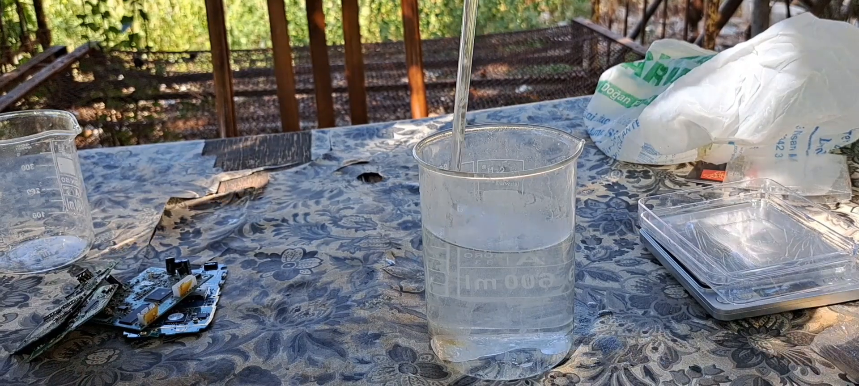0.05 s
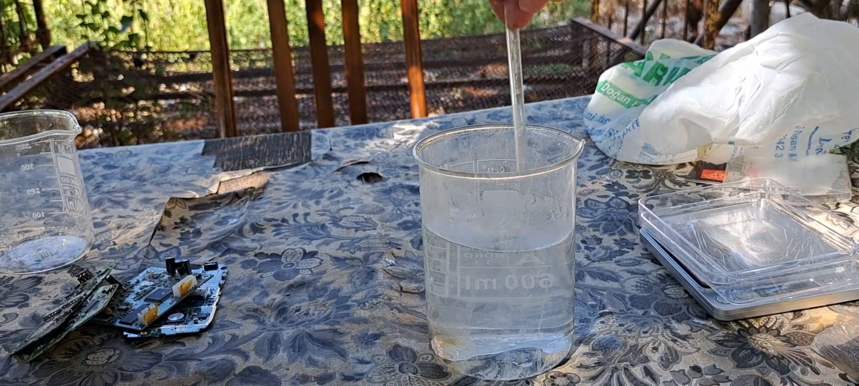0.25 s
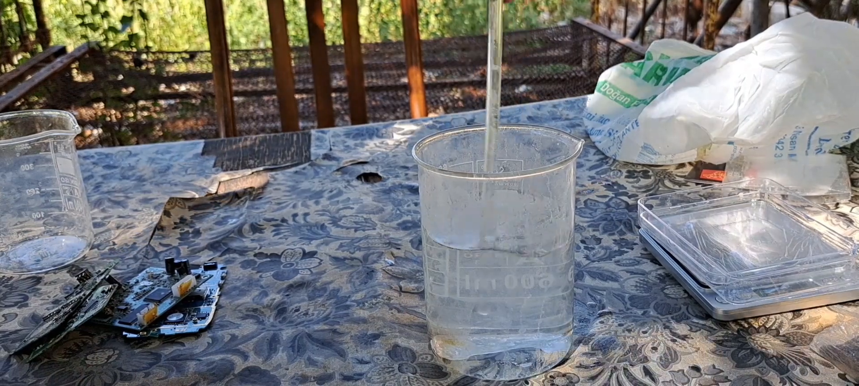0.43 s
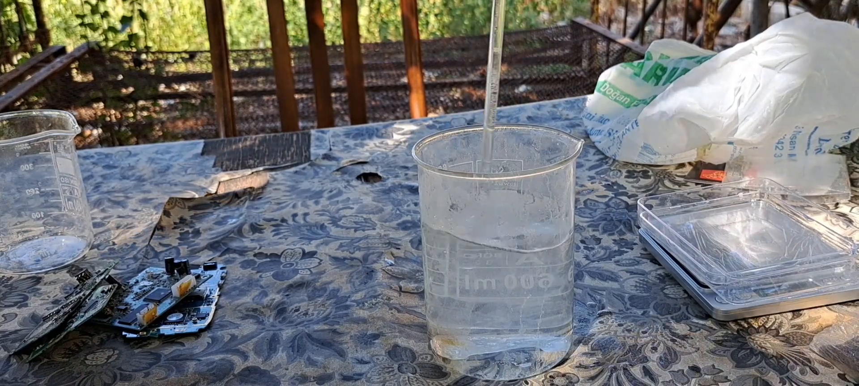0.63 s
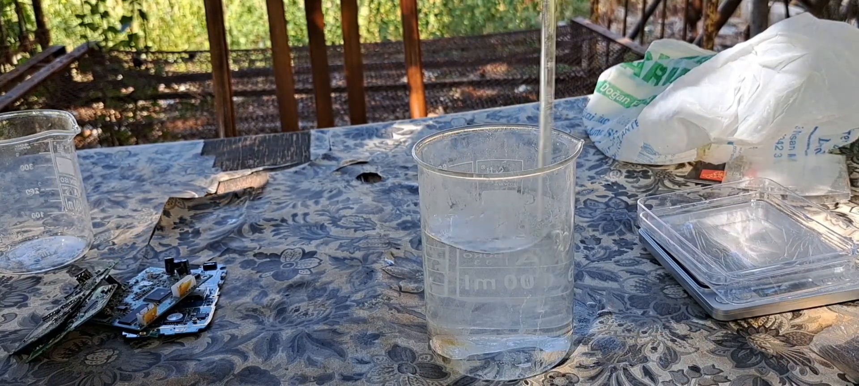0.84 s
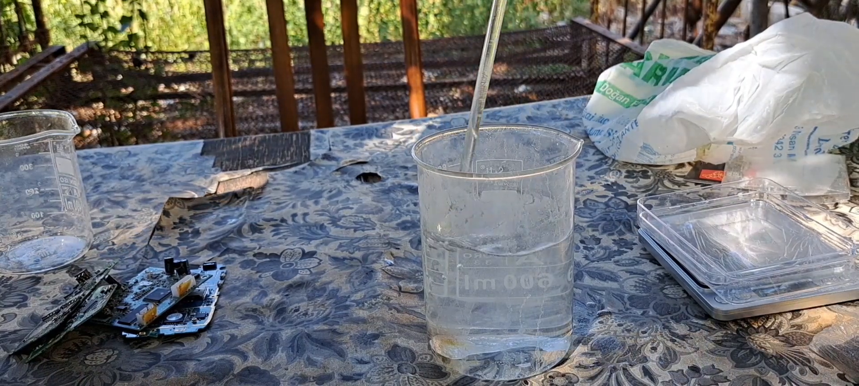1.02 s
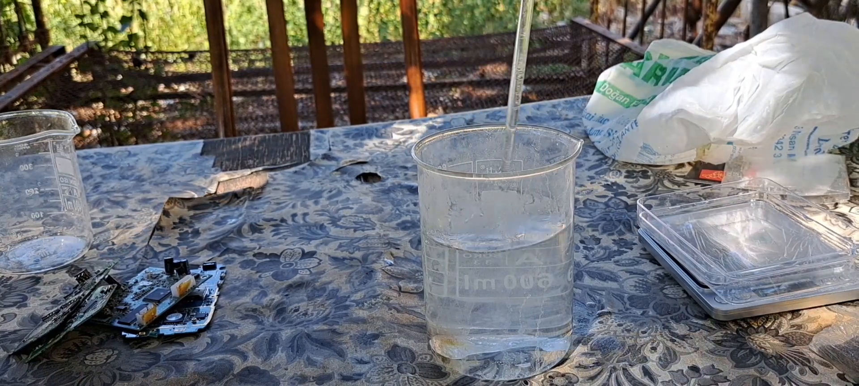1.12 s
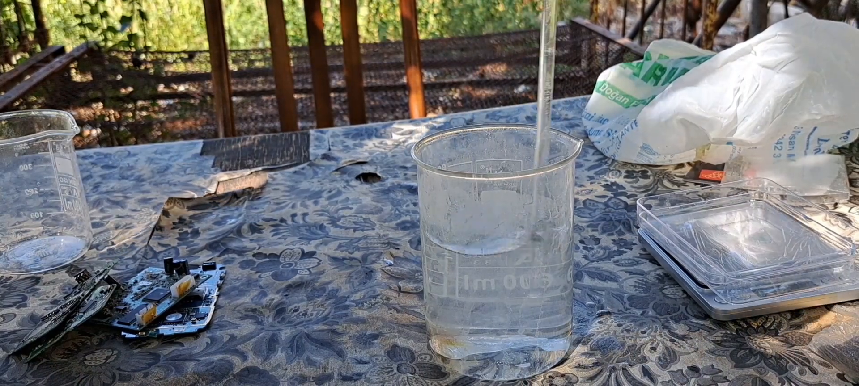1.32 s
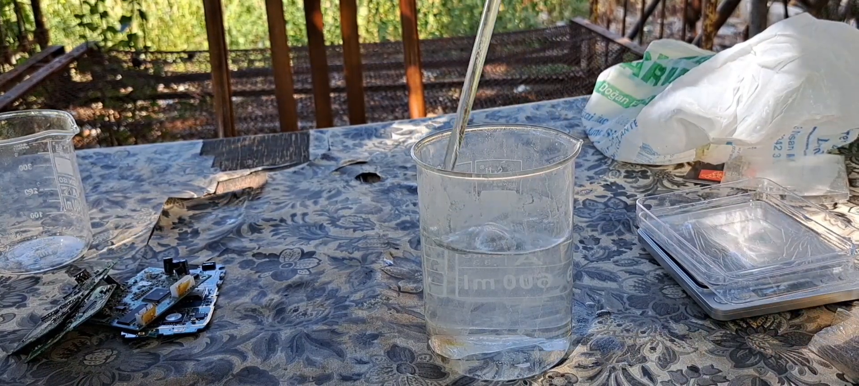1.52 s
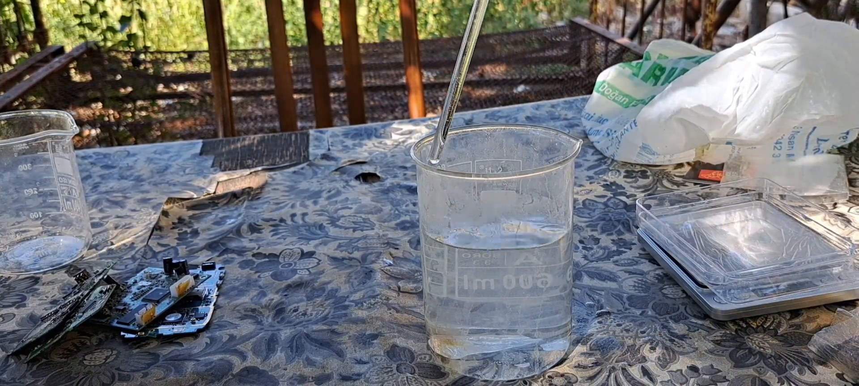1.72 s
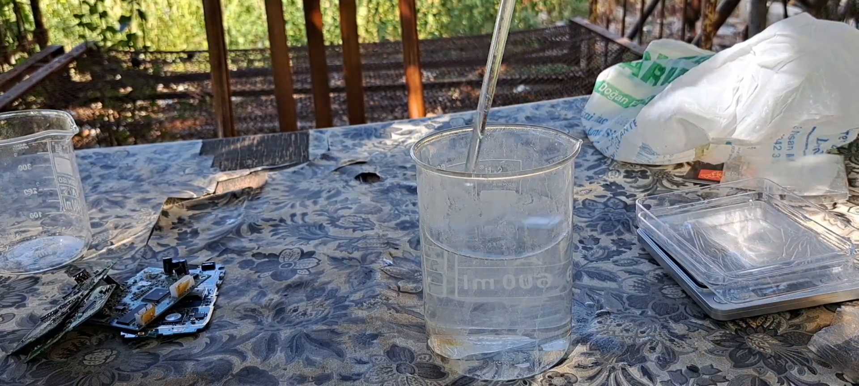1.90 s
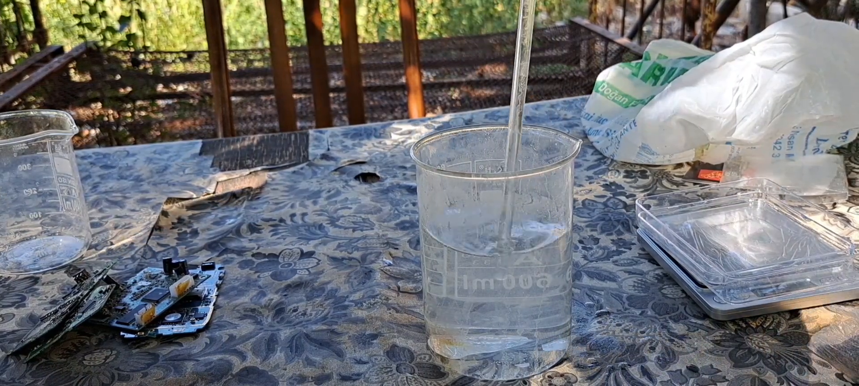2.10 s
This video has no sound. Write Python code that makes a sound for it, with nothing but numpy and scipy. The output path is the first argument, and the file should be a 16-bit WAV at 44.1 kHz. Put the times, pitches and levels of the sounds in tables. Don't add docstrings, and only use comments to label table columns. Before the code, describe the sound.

A glass rod stirring water clinks against a beaker, close and dry outdoors. Soft rustling and small table thuds open, fading by 0.4 s. Bright, quickly damped knocks cluster at 0.2, 0.5, 0.92-0.99, 1.42-1.49 and 1.70 s, with short rings. Faint rubs and taps fall between; tiny watery plops accompany the 0.9 s cluster. Afterwards only faint scraping, low distant traffic and air hiss remain.

```python
import sys
import numpy as np
from scipy import signal
from scipy.io import wavfile

SR = 44100
rng = np.random.default_rng(int(sys.argv[2]) if len(sys.argv) > 2 else 0)


def volts_from_decibels(level):
    exponent = np.asarray(level, float) / 20
    return 10 ** exponent


def master_out(mix):
    frames = np.transpose(np.atleast_2d(mix))
    ceiling = np.clip(frames, -1, 1)
    pcm = np.round(ceiling * 32767).astype(np.int16)
    wavfile.write(sys.argv[1], SR, pcm)


N = 94815


def rms_one(x):
    return x / np.sqrt(np.mean(x ** 2) + 1e-20)


def drift(rate):
    r = np.exp(-80 * np.pi * rate / SR)
    white = rng.standard_normal(N // 40 + 2002)
    slow = signal.lfilter([1], [1, -2 * r, r * r], white)[2000:]
    return np.interp(np.arange(N) / 40, np.arange(len(slow)), rms_one(slow))


def resonance(x, hz, width_hz):
    r = np.exp(-np.pi * width_hz / SR)
    zeros = np.array([1, 0, -1]) * (1 - r * r) / 2
    poles = [1, -2 * r * np.cos(2 * np.pi * hz / SR), r * r]
    return signal.lfilter(zeros, poles, x)


def banded_noise(spectrum, patchy_db):
    hz, db = np.transpose(spectrum)
    out, together = 0, drift(3.0)
    edges = 30 * 2 ** np.arange(0, 9.6, .5)
    white = rng.standard_normal((2, N))
    for k, (low, high) in enumerate(zip(edges, np.minimum(edges[1:], .45 * SR))):
        sos = signal.butter(2, [low, high], "band", fs=SR, output="sos")
        band = signal.sosfilt(sos, white[k % 2])
        level_db = np.interp(np.log(low * high) / 2, np.log(hz), db)
        flicker_db = patchy_db * (.5 * together + drift(7.7))
        out = out + band * volts_from_decibels(level_db + flicker_db)
    return rms_one(out)


def top_edge(x, edge_hz=15800, order=10):
    return signal.sosfilt(signal.ellip(order, .5, 60, edge_hz, fs=SR, output="sos"), x)


def add(out, s, sound):
    i = int(round(s * SR))
    out[i:i + len(sound)] += sound[:N - i]


def struck(hz, db, t60, rise_s, hold_s, t):
    fall_db = 60 * np.maximum(t - hold_s, 0) / t60[:, None]
    cycles = hz[:, None] * t + rng.random((len(hz), 1))
    tones = volts_from_decibels(db[:, None] - fall_db - 9) * np.sin(2 * np.pi * cycles)
    return tones.sum(axis=0) * (1 - np.exp(-t / rise_s))


def colour_db(hz, landing):
    # low/Hz, high/Hz
    landing_bands = [(3130, 3160), (4000, 4200), (4300, 4700), (6900, 7900), (9200, 10800), (11000, 16000),
                     (1900, 2100)]
    return sum(db * ((hz > low) & (hz < high)) for db, (low, high) in zip(landing, landing_bands))


def rod_clack(landing, second_db, t):
    # f/Hz, level/dB
    rod_modes = [(2000, -28), (3250, -20.5), (4470, -7.5), (5100, -9.5), (5380, -11), (5850, -12.5),
                 (7300, 0), (7600, 1), (8150, -6.5), (9000, -9), (9720, 5), (10350, -2.5), (11900, -6),
                 (13600, -6.5)]
    detune, spread_db = 0.0079, 2.5
    t60_s, dull_above_hz = .011, 9300
    hz, db = np.transpose(rod_modes)
    grip = rng.standard_normal((2, len(hz)))
    db = db + colour_db(hz, landing) + second_db * (np.abs(hz - 3200) < 200) + spread_db * grip[1]
    t60 = t60_s * np.minimum(1, dull_above_hz / hz) ** 2
    return struck(hz * (1 + detune * grip[0]), db, t60, rise_s=0.00044, hold_s=.0028, t=t)


def contact_noise(landing, t):
    crack_db, crack_t60_s = -2, 0.008
    wash_db, wash_t60_s = -22, 0.14
    bright = signal.butter(2, [4600, 15000], "band", fs=SR, output="sos")
    noise = signal.sosfilt(bright, rng.standard_normal(len(t)))
    bite_db = sum(landing[5:6])
    crack = noise * volts_from_decibels(crack_db + bite_db - 60 * t / crack_t60_s)
    return crack + top_edge(noise) * volts_from_decibels(wash_db - 60 * t / wash_t60_s)


def beaker_ring(landing, low_db, second_db, t):
    wall_pitches = [1649, 1669, 2660, 3144, 3175, 3262, 4079, 4407, 4464, 5366, 5725, 7460, 9850, 13600]
    # level/dB, t60/s
    wall_modes = [(-18, 0.76), (-24, 1), (-20, 0.33), (-1.5, 0.22), (1, 0.26), (0, 0.09), (-4.5, 0.18),
                  (4.5, 0.17), (1, 0.16), (-4, 0.092), (1, 0.082), (0.5, 0.073), (-5, 0.13), (-33, 0.074)]
    cluster_above_hz, cluster_spread, spread_db = 5000, .02, 1.5
    copies = 1 + 2 * (np.array(wall_pitches) > cluster_above_hz)
    hz, db, t60 = np.repeat(np.c_[wall_pitches, wall_modes], copies, axis=0).T
    place = rng.standard_normal((2, len(hz)))
    lean_db = np.where(hz < 2000, low_db, second_db * (np.abs(hz - 3200) < 200))
    db = db + lean_db + colour_db(hz, landing) + spread_db * place[1]
    split_hz = hz * (1 + cluster_spread * place[0] * (hz > cluster_above_hz))
    return struck(split_hz, db, t60, rise_s=0.0022, hold_s=0, t=t)


def choke_db(s, t):
    # t/s, loss/dB
    leans = [
        (.34, -4),
        (.922, 6),
        (0.978, 28),
        (1.055, 4),
        (1.115, 9),
        (1.464, 14),
        (1.55, 4),
        (1.745, 10.5),
    ]
    choke_s = 0.0044
    return sum(loss_db * np.clip((s + t - at) / choke_s, 0, 1) for at, loss_db in leans if at > s)


def knocks():
    # t/s, clack level/dB, ring level/dB, lowest wall modes/dB, second wall modes/dB
    hard_knocks = [(0.2042, -5.5, -11.5, -4.5, -10.5), (0.235, -5, -17.5, -27, -6.5),
                   (0.2465, -16.5, -24.5, 8, 7), (0.5037, -8, -25, 8, -1), (0.5231, -8, -23.5, -11, 5.5),
                   (0.53, -14.5, -25.5, -27, -25), (0.9233, -2.5, -21.5, 2.5, -1.5),
                   (0.9336, -10.5, -20.5, -8, -7), (0.9861, -14.5, -25.5, 14, -1),
                   (1.4236, -18, -32.5, 22.5, -11), (1.483, -3.5, -25, -14, 6), (1.4888, -17, -39, -3, -4),
                   (1.703, -3.5, -22, 4.5, 9), (1.7105, -26, -42, 4, -3)]
    light_touches = [(0.9115, -62, -56, 0, -18), (0.9377, -24, -44, -3, -10), (0.9593, -32, -38, -4, -5),
                     (0.9792, -28, -30, 8, -30), (1.043, -39.5, -68, 0, -11), (1.136, -44, -70, -6, -4),
                     (1.2873, -38.5, -63, 0, 5), (1.3174, -45, -47.5, 4, -5), (1.395, -40, -55, 0.003, 3),
                     (1.434, -38, -41, 5, -4), (1.4456, -47, -39.5, 4, 7), (1.473, -28, -58, 0, 4),
                     (1.479, -29, -44, 5, -2), (1.732, -25, -28.5, 9, 7), (1.7416, -43, -33, 8, 7),
                     (0.7497, -39, -46, -12, 0), (0.984, -22, -39, 0, -6), (0.816, -33, -40.5, -16, 11),
                     (.833, -33.5, -40, -8, -3)]
    # 3.14 kHz twin/dB, 4.1 kHz/dB, 4.4 kHz/dB, 7.5 kHz/dB, 9.8 kHz/dB
    landing_spots = [(12, 1, 0, -3, 2), (3.5, -1, -1.5, 1.5, 0), (5.5, -1, -12, 2, -7),
                     (-8, -7, -4.5, 1.5, 1), (-14, -2, -5, 5, -0.5), (-14, -4, 2, 5, -7),
                     (2.5, 1, 1.5, -1.5, 2.5), (5, -8, -7, 1, -9), (-3, -9, 1, 5, -3), (-3, 9, -5, -14, -7),
                     (-1.5, 5, -2.5, -2, -2), (7, 2, -11, 4, -1), (-12.5, -3, 3, -4.5, -0.5),
                     (-7, -4, -6, 7, -10)]
    # above 11 kHz/dB, 2 kHz/dB
    knock_bites = [(5.5, 6), (-2, 4), (-4, 7), (1.5, 0), (-5.5, 0), (-13, -1), (-3.5, 2), (-2, 11),
                   (-2, -5), (-4, 2), (-1, 7), (-12, 3), (-8.5, 1), (-5, 2)]
    touch_spot = (2, 4, 0, -1, -2)
    out, t = np.zeros(N), np.arange(int(.4 * SR)) / SR
    short = t[:SR // 8]
    landings = [spot + bite for spot, bite in zip(landing_spots, knock_bites)]
    landings += [touch_spot] * len(light_touches)
    for event, landing in zip(hard_knocks + light_touches, landings):
        s, clack_db, ring_db, low_db, second_db = event
        clack = rod_clack(landing, second_db, short) + contact_noise(landing, short)
        ring = beaker_ring(landing, low_db, second_db, t)
        add(out, s, volts_from_decibels(clack_db) * clack)
        add(out, s, volts_from_decibels(ring_db - choke_db(s, t)) * ring)
    return out


def rubs():
    # t/s, length/s, level/dB, tilt/(dB/octave)
    strokes = [
        (0.648, 0.092, -46, 0.5),
        (0.7473, 0.014, -40, -6),
        (0.756, .04, -48.5, -4),
        (0.806, 0.05, -33.5, -5.5),
        (1.093, 0.098, -51, 9),
        (1.257, 0.088, -52, 6),
        (1.42, 0.053, -33.5, -11.5),
        (1.484, 0.029, -29.5, -2.5),
        (2.013, 0.097, -54.5, 3),
    ]
    # f/Hz, level/dB, width/Hz
    rubbed_modes = [(3150, -10, 10), (3300, -7, 60), (4080, -14, 30), (4460, -7, 40), (5330, -7, 90),
                    (5750, -6, 70), (7430, -2, 90), (7640, -2, 60), (9000, -11, 250), (9750, -9, 200),
                    (10400, -2, 90), (13700, -8, 110)]
    grit_db = 2.5
    out, t = np.zeros(N), np.arange(SR // 4) / SR
    grit = rng.standard_normal(N + SR) * volts_from_decibels(grit_db * np.resize(drift(90.0), N + SR))
    for s, length, db, tilt_db in strokes:
        stroke = np.sqrt(np.abs(np.sin(np.pi * np.minimum(t / length, 1))))
        push = grit[int(s * SR):][:len(t)] * stroke
        body = 0
        for hz, level_db, width_hz in rubbed_modes:
            gain = volts_from_decibels(level_db + tilt_db * np.log2(hz / 6000)) * np.sqrt(100 / width_hz)
            body = body + gain * resonance(push, hz, width_hz)
        add(out, s, volts_from_decibels(db + 14) * body)
    return out


def ticks():
    # t/s, level/dB, f/Hz, t60/s
    tick_events = [(.040, -37, 2500, .03), (1.2478, -36, 14500, .02), (1.4247, -27, 9000, .015),
                   (1.4785, -36, 11800, .012), (1.445, -33, 8700, .03), (1.7035, -30, 1900, .015),
                   (1.7335, -37, 2200, .012), (1.7405, -38, 2000, .012), (.580, -42, 10300, .02),
                   (1.4335, -36, 5600, .02), (1.492, -24, 5200, .04), (1.499, -29, 7100, .13),
                   (.7495, -35, 3350, .05), (.750, -39, 5700, .05), (1.3175, -39, 7630, .08),
                   (1.4455, -36, 5900, .03), (1.4375, -37, 8500, .02), (.208, -27, 12500, .04)]
    out, t = np.zeros(N), np.arange(SR // 10) / SR
    for s, db, hz, t60 in tick_events:
        width_hz = min(1500, 35 / t60)
        puff = resonance(resonance(rng.standard_normal(len(t)), hz, width_hz), hz, 2 * width_hz)
        add(out, s, volts_from_decibels(db - 60 * t / t60) * rms_one(puff))
    return out


def bubbles():
    # t/s, level/dB, start f/Hz, rise/(octave/s), t60/s
    plops = [
        (.891, -37, 1910, 5.3, 0.031),
        (0.893, -46, 1520, 4.6, 0.09),
        (.932, -35.5, 1150, 17, 0.091),
        (0.943, -35, 1430, 13, 0.058),
        (0.953, -29, 1647, 16, 0.054),
        (.980, -16, 1840, 3.9, 0.016),
        (.984, -34, 887, 0.36, 0.12),
        (1.13, -43, 1690, 3, 0.067),
        (.81, -53, 1140, 2.9, 0.091),
    ]
    out, t = np.zeros(N), np.arange(SR // 6) / SR
    for s, db, hz, rise, t60 in plops:
        phase = 2 * np.pi * np.cumsum(hz * 2 ** np.minimum(rise * t, 1)) / SR
        swell = 1 - np.exp(-t / 0.0025)
        add(out, s, volts_from_decibels(db - 60 * t / t60 + 2.5) * swell * np.sin(phase))
    return out


def thuds():
    # t/s, level/dB, f/Hz, t60/s
    thud_events = [(.038, -32, 320, 0.046), (0.051, -27.5, 138.5, 0.074), (.148, -36.5, 435.4, 0.25),
                   (.165, -46, 785, 0.37), (.170, -31, 124, 0.046), (.236, -42, 387, 0.11),
                   (0.523, -42.5, 396, 0.17), (.75, -77, 387, .05), (.93, -50, 378, 0.46),
                   (1.424, -38, 342, 0.15), (1.428, -43.5, 691, 0.17), (1.434, -45.5, 248, 0.19),
                   (1.445, -44.5, 504, 0.14), (1.456, -45, 374, 0.091), (1.497, -49, 260, 0.084),
                   (1.485, -38.5, 422, 0.14), (1.715, -43, 288, 0.084), (1.777, -35, 336, 0.045)]
    out, t = np.zeros(N), np.arange(SR // 6) / SR
    for s, db, hz, t60 in thud_events:
        wobble = resonance(rng.standard_normal(len(t)), hz, 0.29 * hz)
        tone = 0.69 * np.sin(2 * np.pi * hz * t) + 0.53 * rms_one(wobble)
        swell = 1 - np.exp(-t / 0.0013)
        add(out, s, volts_from_decibels(db - 60 * t / t60 + 6) * swell * tone)
    return out


def rustle():
    # t/s, level/dB
    rustle_levels = [
        (0, -36),
        (.06, -35),
        (.085, -39.5),
        (.12, -37.5),
        (.2, -42.5),
        (.33, -45),
        (.4, -59.5),
        (2.15, -50.5),
    ]
    # f/Hz, level/(dB/Hz)
    rustle_colour = [(180, -4), (494, -4), (1230, -17), (2000, -14), (3600, -17.5), (5000, -11.5),
                     (13500, -14), (16000, -35)]
    level_db = np.interp(np.arange(N) / SR, *np.transpose(rustle_levels))
    return volts_from_decibels(level_db) * banded_noise(rustle_colour, patchy_db=0.0)


def garden():
    # f/Hz, level/(dB/Hz)
    floor_spectrum = [(18, -33), (55, 4), (100, -6), (374, -8), (540, -9), (1160, -16), (1630, -15.5),
                      (2170, -20), (16000, -25)]
    floor_db, drone_db = -48.5, -54
    hum_hz, width_hz = 74, 14
    hum = resonance(rng.standard_normal(N), hum_hz, width_hz)
    drone = rms_one(resonance(hum, hum_hz, 2 * width_hz))
    return volts_from_decibels(floor_db) * banded_noise(floor_spectrum, patchy_db=0.5) + volts_from_decibels(drone_db) * drone


def scene():
    air = top_edge(garden() + rustle() + rubs())
    return (knocks() + ticks() + bubbles() + thuds() + air)[None]


def low_pass(x):
    return signal.sosfilt(signal.butter(12, 16810, fs=SR, output="sos"), x)


def record(dry):
    ceiling, rumble_cut_hz = 1.2, 54
    rounded = ceiling * np.tanh(dry / ceiling)
    x = signal.sosfilt(signal.butter(3, rumble_cut_hz, "high", fs=SR, output="sos"), rounded)
    return low_pass(top_edge(x, edge_hz=16300, order=8))


dry = scene()
out = record(dry)
master_out(out)
```